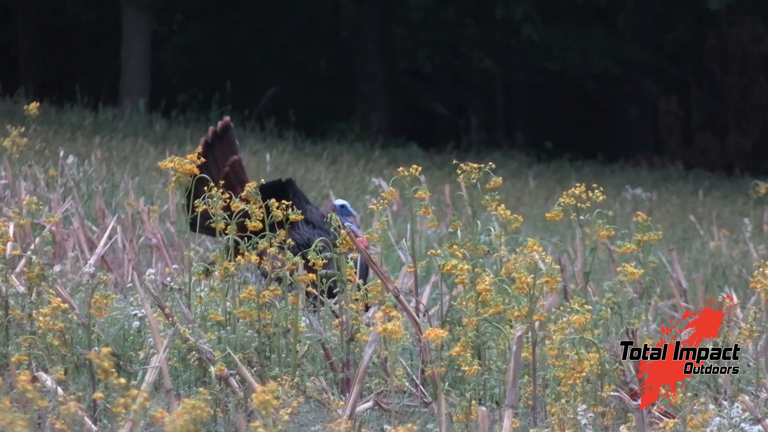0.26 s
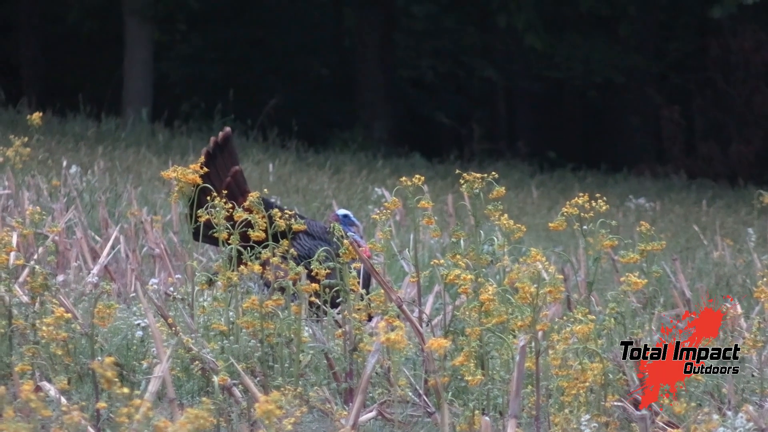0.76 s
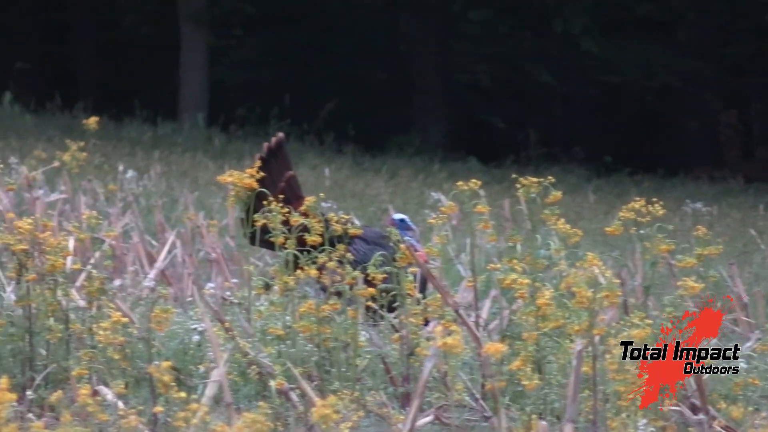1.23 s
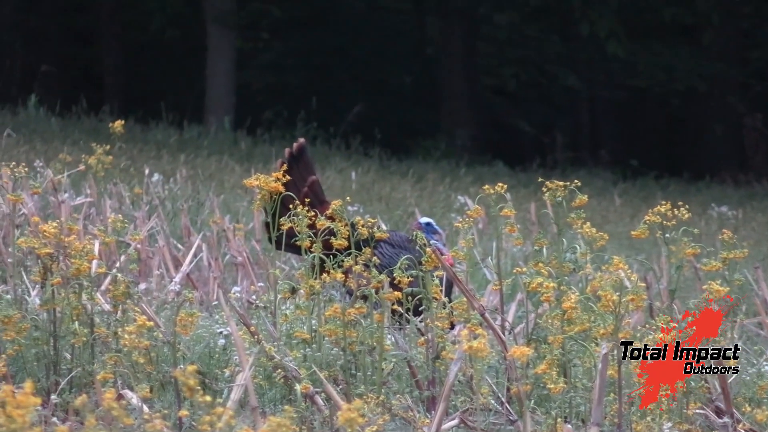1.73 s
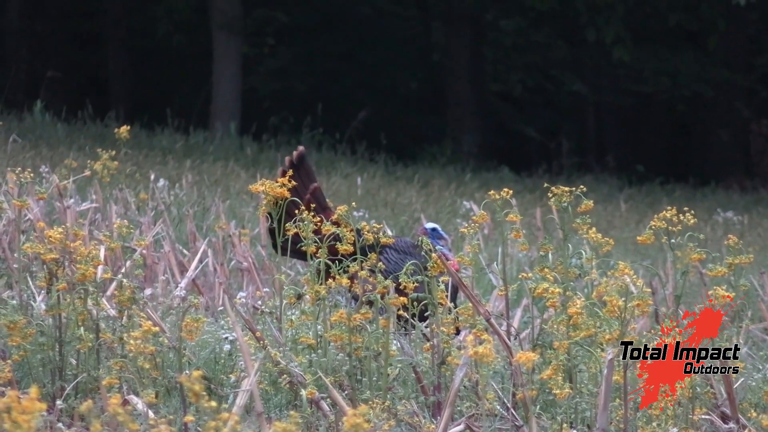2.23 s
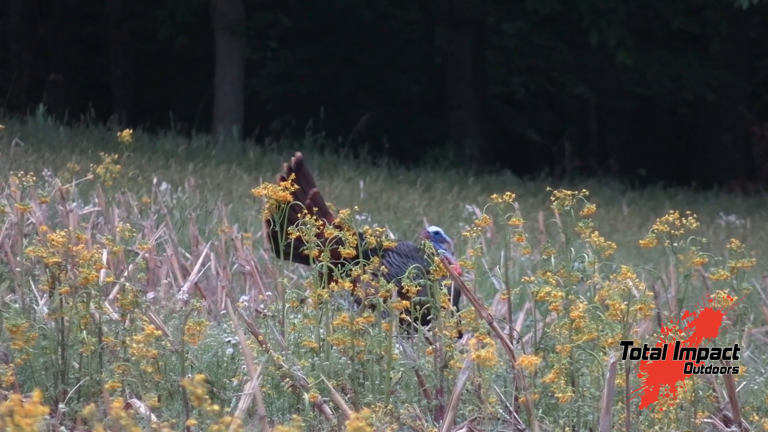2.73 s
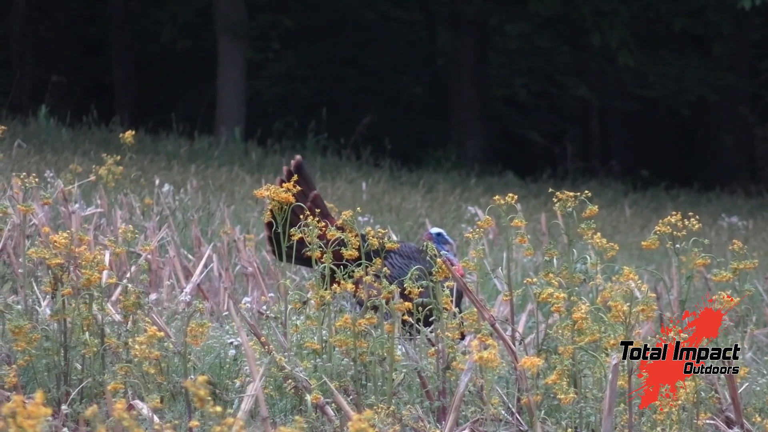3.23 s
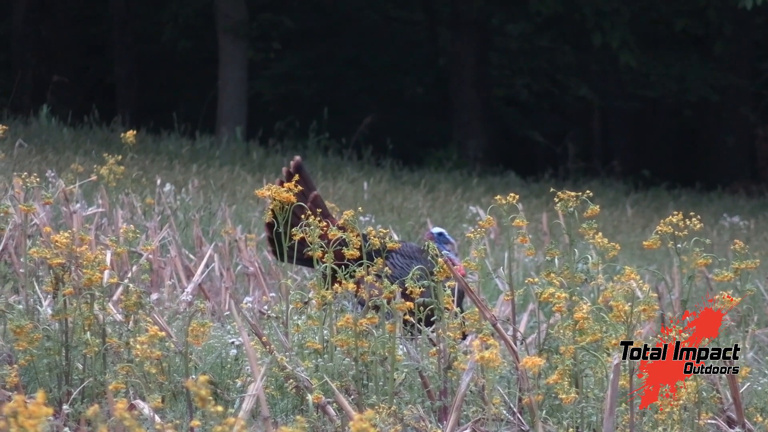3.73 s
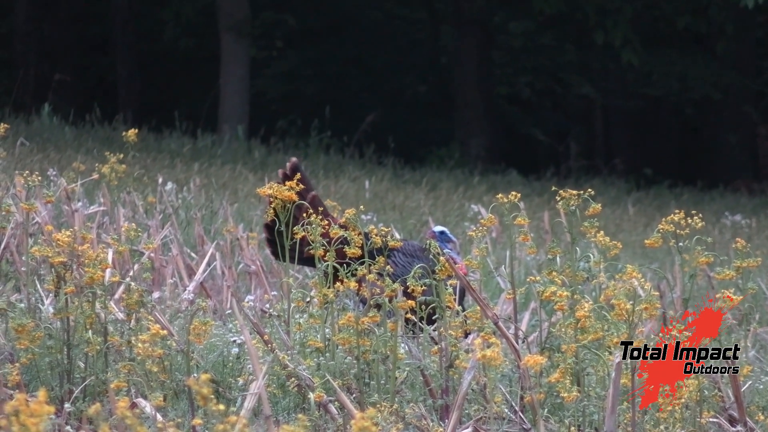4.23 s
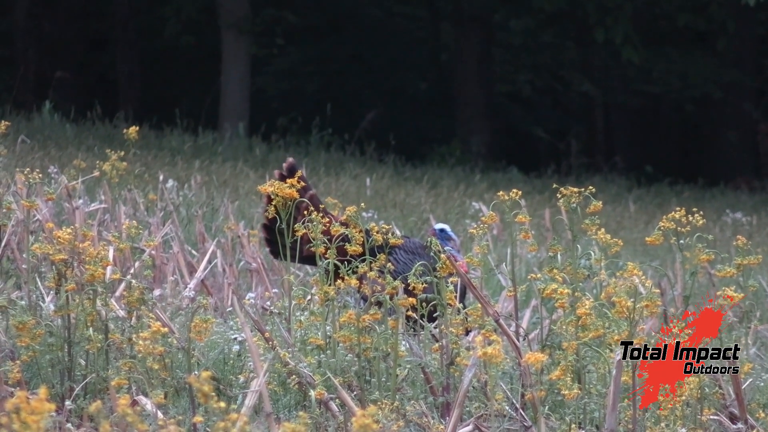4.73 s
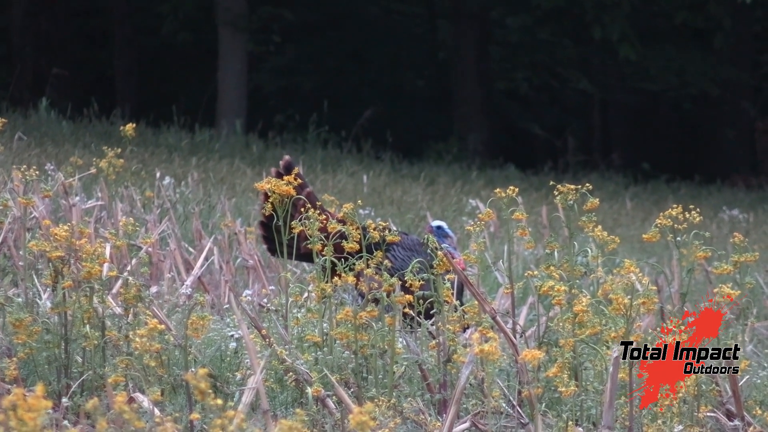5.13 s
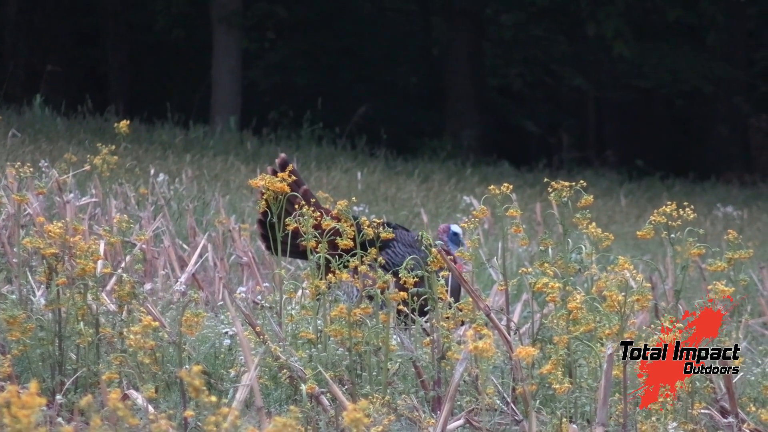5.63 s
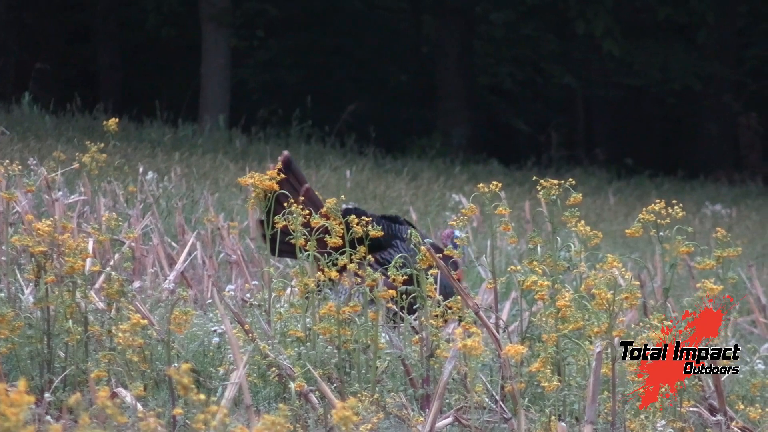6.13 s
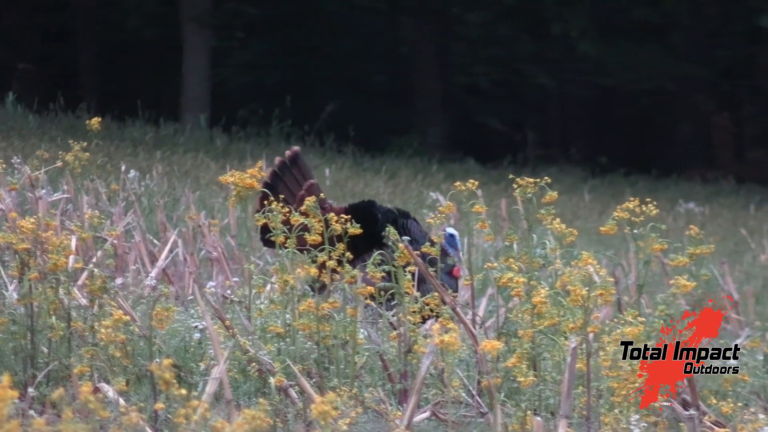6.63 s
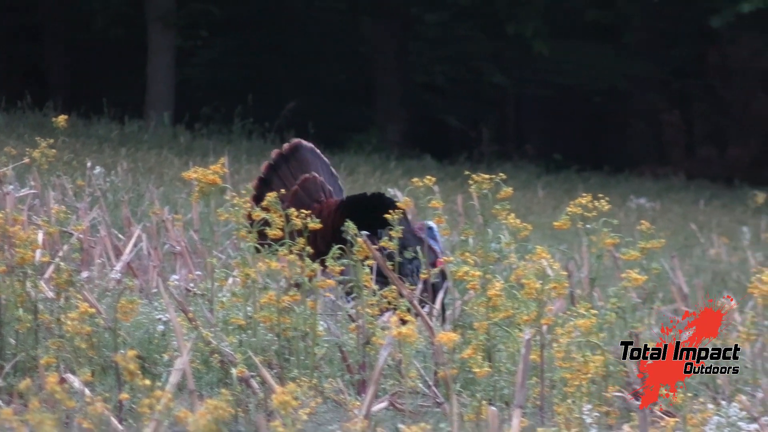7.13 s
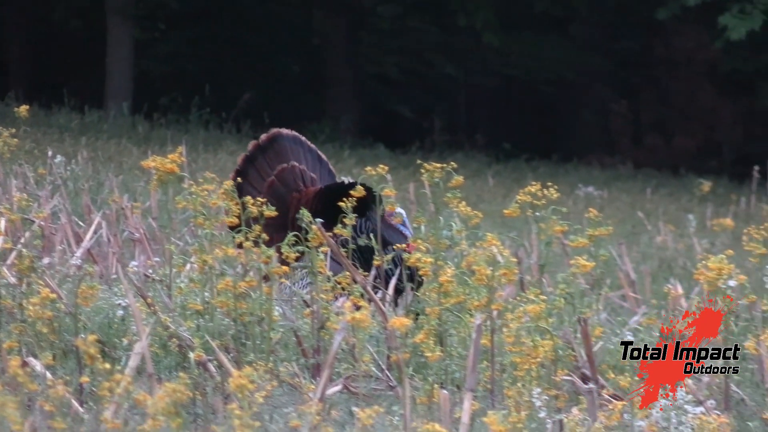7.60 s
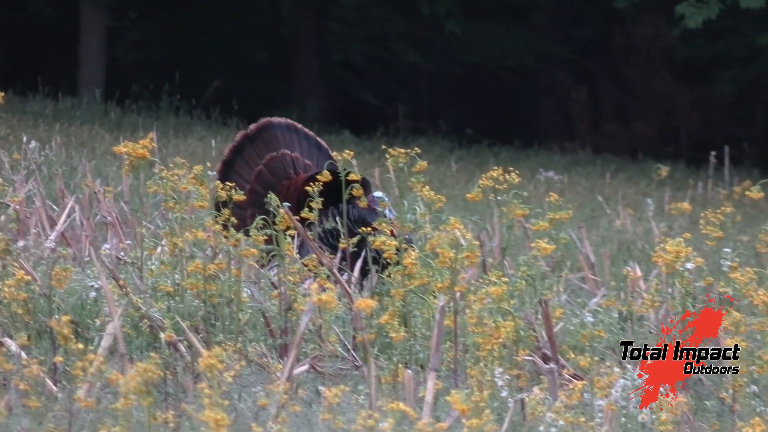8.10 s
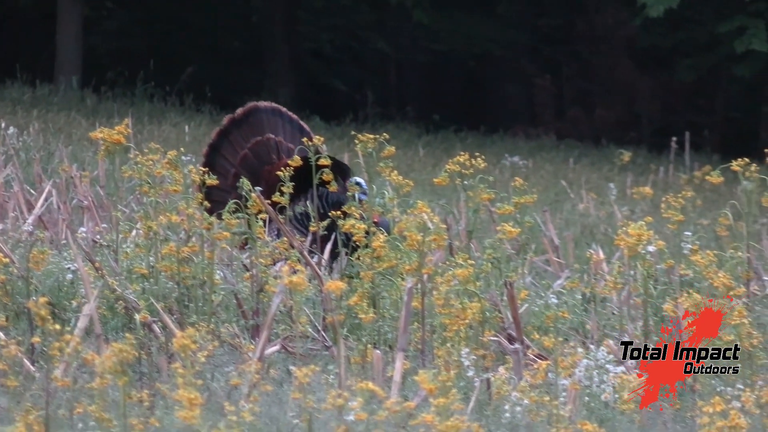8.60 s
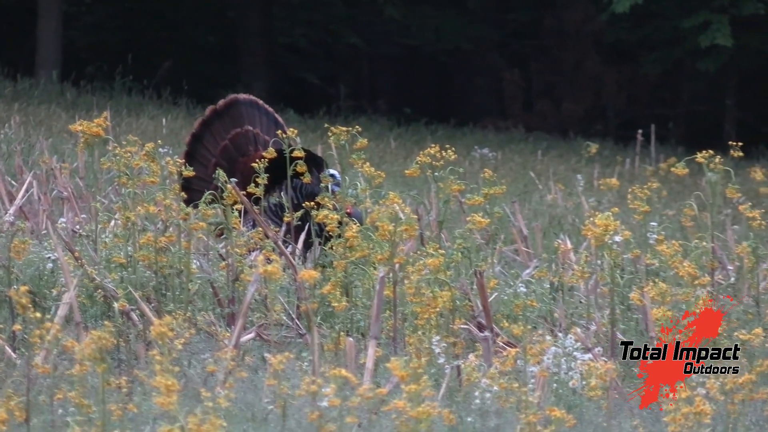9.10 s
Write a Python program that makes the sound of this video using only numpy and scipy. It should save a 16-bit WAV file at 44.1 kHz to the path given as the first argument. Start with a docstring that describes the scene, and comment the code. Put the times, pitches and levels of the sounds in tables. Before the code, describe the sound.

A wet meadow by a wood, heard in mono from one spot for about 9.4 seconds. Near frogs give short bouts of three or four quick, falling chirps around 4.3 kHz; a second sits near 4.7 kHz and a fainter third near 5 kHz joins from 2.4. The nearest pauses around 0.5-1.2 and 7.6-8.7. Birds whistle and slur throughout at 2-4 kHz, blurred by tree reflections, with thin high sweeps mostly before 1.4 and after 7. Small gusts come before 2.2, with dull bumps at 0.9 and 1.3-1.5. Sharp chips sound near 1.4, 3.9, 4.8, 5.2-5.5 and 8.3. A stalk snaps at 4.2 and rustles at 8.0. Five even pipes run from 6.4 to 7.6. A far chorus swells and dips, thinnest near 3, over soft air and a very faint motor hum.

```python
"""A wet meadow at the edge of a wood: three near small frogs repeat short bouts of falling chirps.
Songbirds whistle from the trees: gliding tones, smeared by random reflections into a bright wash.
Farther off, crowds of quick slurs and bands of noise make a chorus that swells and fades.
Under it lie soft air and a breeze of shaped noise, a distant motor's wavering hum, small rustles
in the stalks and a few low bumps near the microphone."""
import sys
import numpy as np
from scipy import signal
from scipy.fft import rfft, irfft, next_fast_len
from scipy.io import wavfile
from scipy.ndimage import uniform_filter1d

SR = 44100
rng = np.random.default_rng(int(sys.argv[2]) if len(sys.argv) > 2 else 0)


def wrap_up_sound(samples):
    """Save the sound to the file named by the first command line argument, as 16-bit audio."""
    columns = np.atleast_2d(samples).T
    # keep every value between -1 and 1, then stretch to whole-number steps
    tamed = np.clip(columns, -1, 1)
    steps = np.round(tamed * 32767).astype(np.int16)
    wavfile.write(sys.argv[1], SR, steps)


N = 412776
TIME = np.arange(N) / SR  # seconds

# still air, spectrum shape: hz, relative_db
AIR_COLOUR = [(20, -5), (70, 1), (120, 7.5), (200, -1), (400, -3.5), (650, 0), (1250, -.5), (1700, -5),
              (2600, -2), (4800, -14), (6300, -22.5), (9000, -22), (11000, -24), (15500, -28)]
AIR_DB = -54
# low breeze, spectrum shape: hz, relative_db
BREEZE_COLOUR = [(15, -5), (45, 4), (85, -2), (150, -0.5), (210, -1), (320, -2), (430, -11.5), (900, -40)]
BREEZE_DB = -67.5  # between gusts
# gusts on the microphone: peak_s, half_length_s (power down to 1/e), level_db
GUSTS = [(.62, 0.12, -60), (1.02, .14, -63), (1.477, .13, -56), (2.04, 0.11, -60), (7.905, .22, -60.5),
         (8.6, 0.76, -61)]
# distant motor, one row a tone: pitch_hz, level_db, wander_hz (rms)
HUM = [(133.5, -62, 1.494), (595, -76.5, 2.94)]

# far chorus, the curve its bands follow: time_s, relative_db
CHORUS = [(0.0, -48), (0.75, -48.5), (1.82, -50), (2.34, -46), (2.66, -52), (2.92, -58), (3.2, -57.5),
          (3.55, -48.5), (3.88, -56.5), (4.8, -49.5), (5.11, -53.5), (6.36, -47), (6.99, -54), (7.27, -53),
          (7.45, -48.5), (8.03, -52.5), (8.91, -48.5), (9.36, -50)]
# thin high hiss above the chorus: time_s, relative_db
HISS = [(0.0, -64), (0.99, -67.5), (1.09, -65), (1.22, -64), (1.28, -58), (1.56, -64), (2.37, -60),
        (2.71, -77), (7.77, -75.5), (7.87, -69), (8.84, -67), (9.36, -65)]
FAR_FROGS_DB, FAR_FROGS_FOLLOW = -57.5, 0.64  # steady part; gain of the part that follows the chorus
# low slurs draw answers from far birds
LOW_VOICE_HZ, ANSWER_DB, ANSWER_LAG_S, ANSWER_SPREAD_S = 2700, -58.5, .07, .11

# bird note levels are those before each note splits into direct sound, leaves and wood
# thin, high voice that sweeps up and levels off: start_s, sweep_s, top_hz, level_db
HIGH_RISES = [(0, 0.057, 6280, -65), (0.269, 0.064, 6120, -63), (.513, 0.0195, 5650, -62),
              (.618, .02, 5600, -59), (1.027, 0.068, 5740, -58), (1.245, 0.065, 5920, -56.5),
              (7.062, 0.073, 5910, -66), (7.913, 0.055, 6200, -65), (8.182, 0.059, 6150, -62.5),
              (8.428, 0.018, 5600, -60), (8.538, 0.021, 5600, -58), (8.941, 0.062, 5900, -61.5),
              (9.174, 0.061, 5850, -61)]
# its drops, some just ahead of a rise: start_s, level_db
HIGH_DROPS = [(.214, -50), (7.17, -54), (7.857, -52.5), (8.13, -50.5)]
HIGH_FOOT_HZ, DROP_FROM_HZ, DROP_S = 4800, 5700, 0.041
HIGH_BEND = 0.67  # share of the drop that is done by mid-note
HIGH_EASE, HIGH_HOLD = .27, .6  # time constant of the climb and extra time at the top, shares of sweep_s

# faint far sounds, blurred to a haze: start_s, length_s, low_hz, high_hz, peak_level_db
HAZES = [(0.14, 0.18, 5660, 7300, -65.5), (3.24, 0.25, 5500, 6800, -68.5), (4.48, .35, 4950, 5400, -64),
         (6.66, 0.21, 5800, 7700, -70), (6.55, 0.53, 700, 900, -62), (7.95, 1.3, 1280, 1520, -65),
         (7.6, 0.72, 216, 337, -61.5)]

# bouts of the three near frogs: first_chirp_s, chirp_count, slowness (factor on the gaps)
NEAR_BOUTS = [(.184, 3, 1), (1.233, 4, 1.05), (1.636, 4, 1), (2.045, 4, 1.01), (2.464, 4, 1.01),
              (2.823, 4, 1.025), (3.272, 4, 1.02), (3.667, 4, 1.03), (4.147, 4, 1), (4.553, 4, 1.04),
              (4.921, 4, 1.01), (5.344, 4, 1), (5.731, 4, 1.001), (6.099, 3, 1.01), (6.415, 4, 1.01),
              (6.843, 4, 1.01), (7.225, 4, 1.02), (8.747, 4, 1), (9.161, 4, 1.02)]
SECOND_BOUTS = [(.507, 4, 0.97), (1.095, 4, 1.01), (1.549, 4, 0.99), (2.153, 4, 0.97), (2.704, 4, 1.001),
                (3.206, 4, 1.01), (3.742, 4, 1), (4.219, 4, 0.96), (4.691, 4, 1), (5.123, 4, 1.07),
                (5.577, 3, 1), (5.942, 4, 1.01), (6.475, 4, 1.01), (7.097, 4, 0.98), (7.568, 4, 1),
                (8.166, 4, 1), (8.68, 4, 1.02), (9.26, 4, 1.001)]
THIRD_BOUTS = [(2.44, 3, 1), (2.853, 3, 1.14), (3.54, 3, 0.95), (3.985, 3, .99), (4.68, 3, 0.64),
               (5.102, 3, 1.1), (5.67, 3, 1.07), (6.135, 3, 0.87), (6.665, 3, .99), (7.13, 3, 0.79),
               (7.72, 3, 0.95), (8.725, 3, 0.9)]
# chirps of each frog's bout, before small random changes of pitch and level:
# gap_before_s (at slowness 1), pitch_hz (mid-chirp), fall_hz_per_s,
# half_length_s (stretched 1.5 times for the swell), level_db (direct sound)
NEAR_CHIRPS = [(0, 4330, 20800, 0.0047, -41.5), (0.045, 4366, 21730, 0.0072, -37),
               (.056, 4360, 22000, .0085, -37), (.065, 4370, 21660, 0.0067, -36.5)]
SECOND_CHIRPS = [(0, 4615, 5800, 0.0044, -46.5), (.042, 4755, 16700, 0.0033, -41),
                 (.054, 4770, 20000, .006, -44.5), (.062, 4720, 20100, 0.0063, -44)]
THIRD_CHIRPS = [(0, 5020, 8900, 0.0044, -60.5), (.055, 5050, 8900, 0.004, -58),
                (.056, 5030, 9000, .005, -57.5)]

# level whistles: start_s, length_s, pitch_hz, level_db
WHISTLES = [(.55, .066, 3890, -42.5), (0.662, .06, 4020, -42.5), (0.931, 0.11, 3450, -46),
            (1.171, 0.082, 3220, -39.5), (1.297, 0.157, 2298, -62), (2.088, .09, 3700, -45.5),
            (5.419, 0.082, 3730, -47.5), (5.628, 0.076, 3965, -45), (6.313, 0.13, 3730, -46),
            (8.95, 0.042, 3202, -41.5)]
WHISTLE_SAG = 0.0277  # a whistle starts this share above its pitch and ends as far below
# slurred bird notes, rising or falling: start_s, length_s, first_hz, last_hz, level_db
SLURS = [(0.75, 0.065, 3850, 3280, -43), (.875, .039, 3200, 2685, -50), (1.141, 0.06, 2450, 3220, -47.5),
         (1.51, .04, 3500, 3950, -46), (1.561, 0.047, 3000, 2500, -55), (1.81, .05, 3900, 3450, -46),
         (2.232, 0.035, 3370, 3000, -40), (2.347, 0.042, 2415, 3840, -37.5),
         (2.415, 0.045, 2900, 2506, -50), (3.306, .039, 2530, 2980, -49), (3.366, 0.085, 3750, 3185, -43),
         (3.437, 0.054, 3450, 2510, -44.5), (3.582, 0.044, 2850, 3624, -39),
         (3.607, 0.054, 3470, 2576, -47), (4.072, 0.064, 3050, 2570, -55), (4.725, 0.054, 2994, 3570, -45),
         (4.758, 0.072, 3400, 2100, -47), (4.833, 0.035, 2330, 3130, -42.5), (5.424, .035, 3050, 2280, -54),
         (5.807, 0.072, 3000, 2335, -49.5), (5.943, 0.12, 2930, 4400, -43),
         (6.125, 0.045, 2970, 2230, -48.5), (6.162, 0.035, 2980, 4060, -40), (6.24, 0.059, 2450, 3430, -43),
         (6.545, 0.06, 2860, 3270, -49), (6.579, 0.054, 2170, 2690, -51), (6.907, 0.056, 2160, 2690, -52),
         (7.262, 0.037, 3480, 2520, -46.5), (7.302, .041, 2950, 3760, -45), (7.429, .085, 3550, 2200, -46),
         (7.545, 0.12, 2160, 2690, -53), (8.202, 0.13, 3150, 2240, -59), (8.57, .08, 2250, 2910, -51.5),
         (8.739, 0.043, 2846, 3550, -42.5), (8.77, 0.042, 2950, 2320, -46.5),
         (8.916, 0.032, 3520, 2870, -41.5)]
SLUR_BEND = 0.69  # share of the glide that is done by mid-note
NOTE_WAVER = .012  # of whistles and slurs, share of the pitch

# soft low bumps near the microphone: start_s, level_db
THUMPS = [(.925, -54), (1.344, -48), (1.425, -49), (1.505, -52), (7.99, -56)]
# sharp bird chips close by: start_s, length_s, first_hz, middle_hz, last_hz, level_db (direct sound)
CHIPS = [(1.409, 0.011, 10400, 7550, 6960, -54), (3.897, 0.013, 5800, 5090, 5000, -52.5),
         (4.846, .014, 5600, 5050, 4850, -55), (5.224, 0.016, 5600, 5100, 4900, -54),
         (5.28, .014, 5600, 5080, 4800, -59), (5.496, 0.0097, 9580, 7550, 7000, -51.5),
         (8.315, 0.021, 5280, 5100, 4770, -48)]
# stalks that snap and rustle: start_s, length_s, low_hz, high_hz, level_db
RUSTLES = [(4.206, 0.0019, 560, 3600, -38.5), (7.964, 0.043, 1680, 4140, -46)]
# one bird pipes a row of even notes
PIPE_START_S, PIPE_EVERY_S, PIPE_LENGTH_S, PIPE_HZ, PIPE_DB = 6.36, 0.3, 0.058, 3046, -49
EDGE_HZ = 15750  # top of the recorder's band


def gain_of(db):
    """Decibels to amplitude."""
    return 10 ** (np.asarray(db) / 20)


def evened(x):
    """Scales to an rms of one."""
    return x / np.sqrt(np.mean(x ** 2) + 1e-20)


def add(mix, start_s, sound):
    """Mixes a sound in at start_s, cut off at the ends of the mix."""
    start = round(start_s * SR)
    sound = sound[max(-start, 0):]
    part = mix[max(start, 0):][:len(sound)]
    part += sound[:len(part)]


def sine(hz):
    """A tone of unit rms that follows a pitch curve, by summing the pitch into phase."""
    return np.sqrt(2) * np.sin(2 * np.pi * np.cumsum(hz) / SR)


def noise(colour):
    """Noise of unit rms with a spectrum of (hz, relative_db) points, joined on a log pitch scale."""
    hz, db = np.transpose(colour)
    size = next_fast_len(N)
    bins_hz = np.fft.rfftfreq(size, 1 / SR)
    shape = gain_of(np.interp(np.log(bins_hz + 1), np.log(hz), db))
    return evened(irfft(rfft(rng.standard_normal(size)) * shape, size)[:N])


def band_noise(low_hz, high_hz):
    """Noise of unit rms between two pitches, with steep sides."""
    band = signal.butter(4, sorted([low_hz, high_hz]), "band", fs=SR, output="sos")
    return evened(signal.sosfilt(band, rng.standard_normal(N)))


def drift(rate):
    """A smooth random curve of unit rms, with rate new values a second."""
    knots = rng.standard_normal(4000)
    curve = np.interp(TIME * rate, np.arange(len(knots)), knots)
    return evened(uniform_filter1d(curve, size=200))


def swell(peak_s, half_length_s):
    """A smooth rise and fall around peak_s."""
    return np.exp(-((TIME - peak_s) / half_length_s) ** 2)


def scatter(x, t60, delay):
    """Many small reflections of random sign die away by 60 dB in t60 seconds and lengthen the sound."""
    t = np.arange(int((t60 + delay) * SR) + 64) / SR
    decay = gain_of(-60 * np.maximum(t - delay, 0) / t60)
    taps = rng.standard_normal(len(t)) * (t >= delay) * decay
    return signal.oaconvolve(x, taps / np.linalg.norm(taps))


def whistle(length_s, first_hz, middle_hz, last_hz, waver=.012):
    """One bird note: a pure tone that bends through three pitches and wavers a little."""
    u = np.linspace(0, 1, max(int(length_s * SR), 8))
    # a parabola through the three pitches
    hz = first_hz * (1 - u) * (1 - 2 * u) + middle_hz * (2 * u) * (2 - 2 * u) + last_hz * u * (2 * u - 1)
    wobble = np.interp(TIME[:len(u)] * 250, np.arange(64), rng.standard_normal(64))
    envelope = np.sqrt(np.abs(np.sin(np.pi * u)))
    return sine(hz * (1 + waver * wobble)) * envelope


def glide(length_s, first_hz, last_hz, bend, waver):
    """A slur moves quickly at first and eases into its last pitch."""
    middle_hz = first_hz + bend * (last_hz - first_hz)
    return whistle(length_s, first_hz, middle_hz, last_hz, waver)


def background():
    """Still air, a low breeze whose gusts add power, and the wavering hum of a distant motor."""
    air = gain_of(AIR_DB + 0.59 * drift(rate=5.5)) * noise(AIR_COLOUR)
    gust_power = sum(gain_of(db) ** 2 * swell(peak_s, half_s) for peak_s, half_s, db in GUSTS)
    breeze = np.sqrt(gain_of(BREEZE_DB) ** 2 + gust_power) * noise(BREEZE_COLOUR)
    hum = np.zeros(N)
    for hz, db, wander_hz in HUM:
        level = gain_of(db + 1.2 * drift(rate=6.5))
        hum += level * sine(hz + wander_hz * drift(rate=9))
    return air + breeze + hum


def flock(low_hz, high_hz, bend, count=380):
    """A crowd of quick far slurs, heard by way of the wood; the farthest merge into a hiss."""
    song = np.zeros(N)
    for when, length, pitch, rise, fall in rng.random((count, 5)):
        hz = low_hz + (high_hz - low_hz) * pitch
        slur = bend * np.sign(rise - .5)  # up or down
        note = whistle(.025 + .035 * length, hz * (1 + slur), hz, hz * (1 - slur * fall))
        add(song, when * (N / SR + .2) - .2, note)
    wash = .5 * song + scatter(song, t60=.2, delay=.002)[:N]
    # level out crowded and sparse moments
    wash /= np.sqrt(np.abs(uniform_filter1d(wash ** 2, size=5000)) + 1e-3)
    farthest = gain_of(-2.5 + 2 * drift(rate=25)) * band_noise(low_hz, high_hz)
    return evened(wash + farthest)


def far_chorus():
    """Far birds and frogs swell and fade together; low voices answer low slurs, a thin hiss lies on top."""
    chorus, hiss = (gain_of(np.interp(TIME, *np.transpose(curve))) for curve in (CHORUS, HISS))
    answers = sum(swell(s + ANSWER_LAG_S, ANSWER_SPREAD_S)
                  for s, _, first_hz, last_hz, _ in SLURS if min(first_hz, last_hz) < LOW_VOICE_HZ)
    # hypot adds powers
    low_level = np.hypot(gain_of(-14) * chorus, gain_of(ANSWER_DB) * np.sqrt(answers))
    frog_level = np.hypot(gain_of(FAR_FROGS_DB), FAR_FROGS_FOLLOW * chorus)
    thin_top = noise([(2000, -60), (4400, -4), (5000, 9), (5600, -0.5),
                      (6400, -7), (7500, -22.5), (10000, -34)])
    low_birds = low_level * flock(2450, 3050, bend=0.098)
    birds_above = gain_of(.5) * chorus * flock(3000, 4000, bend=0.1199)
    far_frogs = frog_level * flock(3950, 4750, bend=0.0608)
    return low_birds + birds_above + far_frogs + gain_of(3.5) * hiss * thin_top


def climb(sweep_s, top_hz):
    """The high voice climbs fast, then dwells on its top pitch as it fades."""
    t = TIME[:int(sweep_s * (1 + HIGH_HOLD) * SR)]
    hz = top_hz - (top_hz - HIGH_FOOT_HZ) * np.exp(-t / (HIGH_EASE * sweep_s))
    envelope = np.abs(np.sin(np.pi * np.sqrt(t / t[-1])))
    return evened(sine(hz) * envelope)


def high_voice():
    """A thin voice's rises and drops in pitch, as (start_s, level_db, tone)."""
    rises = [(s, db, climb(sweep_s, top_hz)) for s, sweep_s, top_hz, db in HIGH_RISES]
    drops = [(s, db, glide(DROP_S, DROP_FROM_HZ, HIGH_FOOT_HZ, HIGH_BEND, waver=.004))
             for s, db in HIGH_DROPS]
    return rises + drops


def hazes():
    """Each blurred band of noise swells quickly, fades slowly, then stays on faintly at .18 of its peak."""
    out = np.zeros(N)
    for s, length_s, low_hz, high_hz, db in HAZES:
        turns_s = [s, s + 0.16 * length_s, s + 0.85 * length_s, s + length_s]
        envelope = np.interp(TIME, turns_s, [0, 1, 0.55, 0.18])
        out += gain_of(db) * envelope * band_noise(low_hz, high_hz)
    return out


def frog(bouts, chirps, second_db, third_db, grass_db, wood_db):
    """The vocal sac rings in a swelling, falling tone with faint overtones; grass and wood scatter it."""
    out, t = np.zeros(N), np.arange(-SR // 40, SR // 40) / SR
    for s, count, slowness in bouts:
        # a bout one chirp short leaves out the last but one
        for gap_s, hz, fall, half_s, db in chirps[:int(round(count)) - 1] + chirps[-1:]:
            s += gap_s * slowness
            detune, effort = rng.standard_normal(2)
            phase = 2 * np.pi * np.cumsum(hz * (1 + 0.0036 * detune) - fall * t) / SR
            overtones = gain_of(second_db) * np.sin(2 * phase) + gain_of(third_db) * np.sin(3 * phase)
            tone = np.sin(phase) + overtones
            envelope = np.exp(-np.abs(t / half_s / 1.5) ** 3)
            # as the air runs out the tone breaks into a quick flutter
            depth = 0.54 * np.clip(t / half_s + 0.64, 0, 1)
            flutter = 1 + depth * np.sin(2 * np.pi * (rng.uniform(134, 274) * t + rng.random()))
            chirp = np.sqrt(2) * gain_of(db + 0.45 * effort) * envelope * flutter * tone
            add(out, s + t[0], chirp)
            add(out, s + t[0], gain_of(grass_db) * scatter(chirp, t60=.04, delay=.001))
    return out + gain_of(wood_db) * scatter(out, t60=0.29, delay=0.024)[:N]


def frogs():
    """Three callers, each at its own pitch and distance; the farther, the more the grass scatters it."""
    near = frog(NEAR_BOUTS, NEAR_CHIRPS, second_db=-48, third_db=-41.5, grass_db=-11, wood_db=-26)
    second = frog(SECOND_BOUTS, SECOND_CHIRPS, second_db=-28.5, third_db=-32.5, grass_db=-7, wood_db=-11)
    third = frog(THIRD_BOUTS, THIRD_CHIRPS, second_db=-35, third_db=-32, grass_db=-4, wood_db=-20)
    return near + second + third


def whistles():
    """Nearly level tones that sag slightly in pitch, as (start_s, level_db, tone)."""
    return [(s, db, whistle(length_s, hz * (1 + WHISTLE_SAG), hz, hz * (1 - WHISTLE_SAG), NOTE_WAVER))
            for s, length_s, hz, db in WHISTLES]


def slurs():
    """Tones that glide up or down, as (start_s, level_db, tone)."""
    return [(s, db, glide(length_s, first_hz, last_hz, SLUR_BEND, NOTE_WAVER))
            for s, length_s, first_hz, last_hz, db in SLURS]


def thumps():
    """Each bump near the microphone is a short, dull puff of low noise that dies quickly."""
    out, t = np.zeros(N), TIME[:SR // 5]
    rumble = noise([(20, -12), (55, -7), (150, 6), (220, -10), (330, -1), (430, -26), (900, -52)])
    puff = (t / .014) * np.exp(1 - t / .014)  # peaks after 14 ms
    for s, db in THUMPS:
        add(out, s, gain_of(db) * puff)
    return out * rumble


def chips():
    """A chip starts abruptly and plunges in pitch, with a short scattered tail."""
    out = np.zeros(N)
    for s, length_s, first_hz, middle_hz, last_hz, db in CHIPS:
        u = np.linspace(0, 1, max(int(length_s * SR), 8))
        hz = np.interp(u, [0, .5, 1], [first_hz, middle_hz, last_hz])
        add(out, s, gain_of(db) * sine(hz) * signal.windows.tukey(len(u), .15))
    return out + gain_of(-3.5) * scatter(out, t60=0.057, delay=0.00044)[:N]


def stalks():
    """Dry stalks give a snap in a short grainy scrape of band-limited noise, with a faint fizz on top."""
    out = np.zeros(N)
    for s, length_s, low_hz, high_hz, db in RUSTLES:
        size = max(int(length_s * SR), 16)
        grains = rng.standard_normal(size) * signal.windows.tukey(size, .5)
        grains = np.pad(grains, (0, 200))  # room for the filter to ring out
        grains[size // 4] += 12  # the snap
        band = signal.butter(2, [low_hz, high_hz], "band", fs=SR, output="sos")
        scrape = signal.sosfilt(band, grains) + gain_of(-26) * grains
        add(out, s, gain_of(db) * scrape / np.sqrt(np.sum(scrape ** 2) / size))
    return out


def pipes(count):
    """One bird's evenly spaced notes of steady pitch, as (start_s, level_db, tone)."""
    starts_s = PIPE_START_S + PIPE_EVERY_S * np.arange(count)
    return [(s, PIPE_DB, whistle(PIPE_LENGTH_S, PIPE_HZ, PIPE_HZ, PIPE_HZ, waver=0.011)) for s in starts_s]


def birds(direct_db, leaves_db, wood_db):
    """Each note comes from its own perch: it flutters, leaves break it up and the trunks add a long tail."""
    song = np.zeros(N)
    for s, db, tone in high_voice() + whistles() + slurs() + pipes(count=5):
        flutter_db = np.interp(TIME[:len(tone)] * 140, np.arange(40), 2.8 * rng.standard_normal(40))
        note = gain_of(db) * tone * evened(gain_of(flutter_db))
        add(song, s, gain_of(direct_db) * note)
        for level_db, t60 in ((leaves_db, .12), (wood_db, .85)):
            echo = scatter(note, t60, delay=0.0032)
            echo *= np.linalg.norm(note) / np.linalg.norm(echo)  # the note's own energy
            add(song, s, gain_of(level_db) * echo)
    return song


def scene():
    """The meadow, heard from one spot, on one channel."""
    far = background() + far_chorus() + hazes()
    songs = birds(direct_db=-3.5, leaves_db=-4.5, wood_db=-3.2)
    return (far + songs + frogs() + thumps() + chips() + stalks())[None]


def record(dry):
    """The recorder's band limit: a steep low-pass."""
    low_pass = signal.firwin(511, EDGE_HZ, window=("kaiser", 9), fs=SR)
    return signal.oaconvolve(dry, low_pass[None], "same")


dry = scene()
out = record(dry)
wrap_up_sound(out)
```